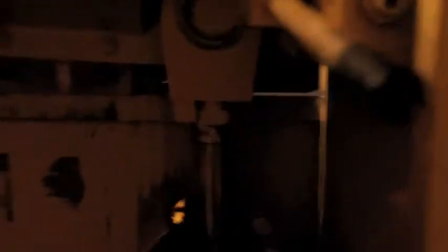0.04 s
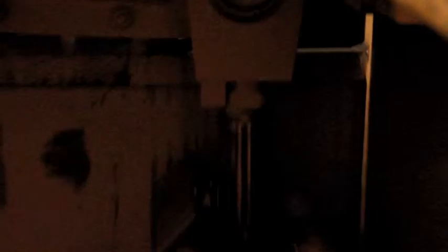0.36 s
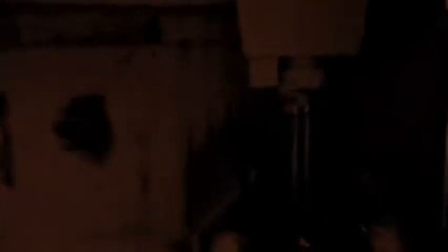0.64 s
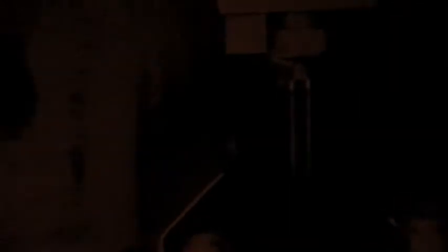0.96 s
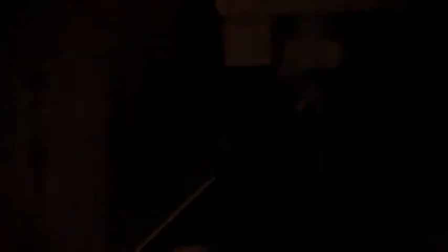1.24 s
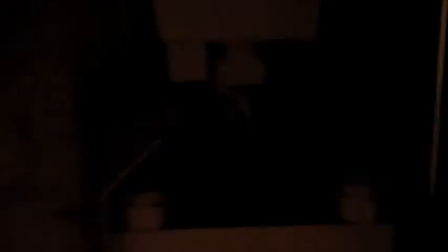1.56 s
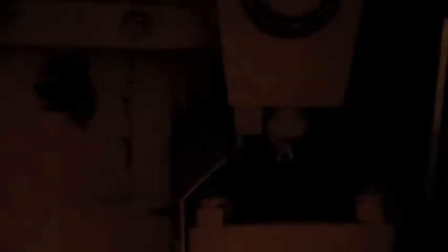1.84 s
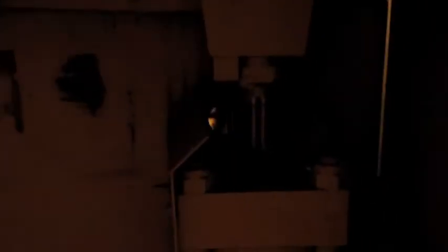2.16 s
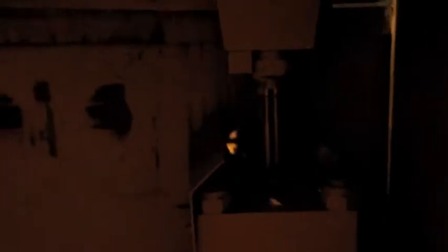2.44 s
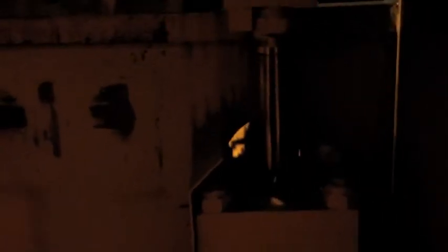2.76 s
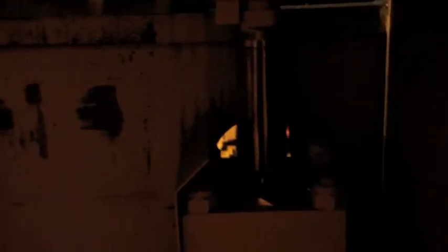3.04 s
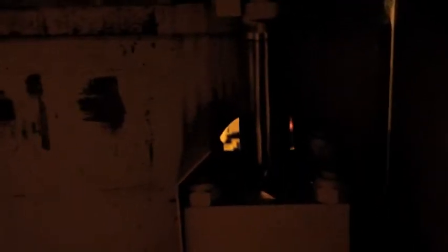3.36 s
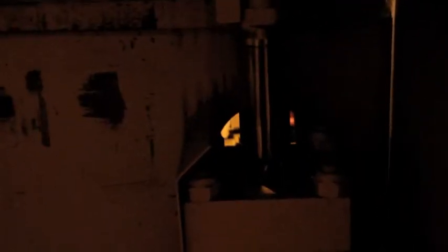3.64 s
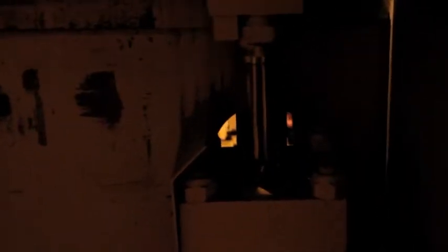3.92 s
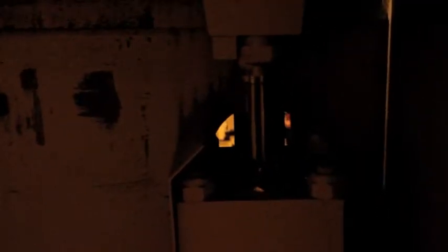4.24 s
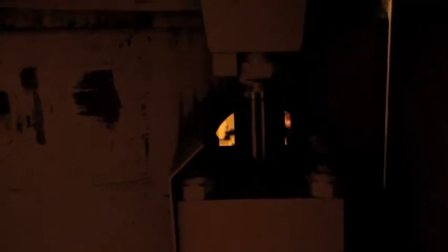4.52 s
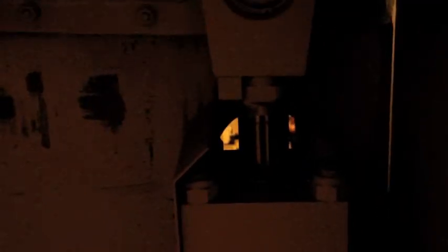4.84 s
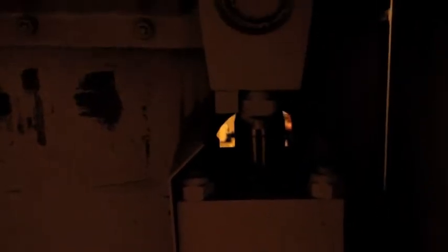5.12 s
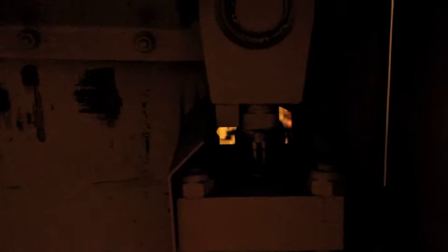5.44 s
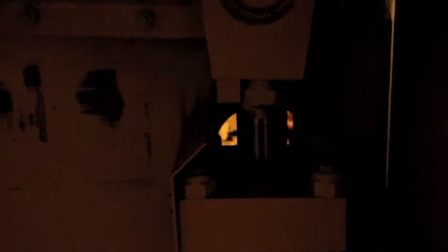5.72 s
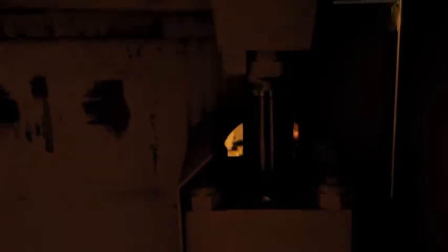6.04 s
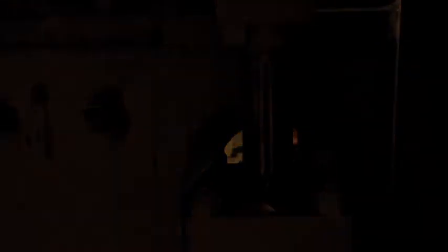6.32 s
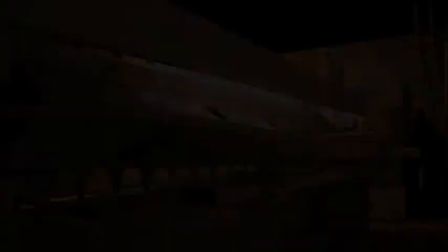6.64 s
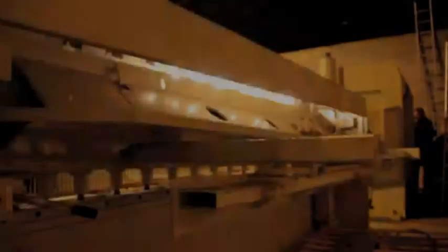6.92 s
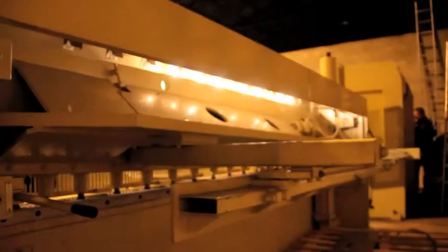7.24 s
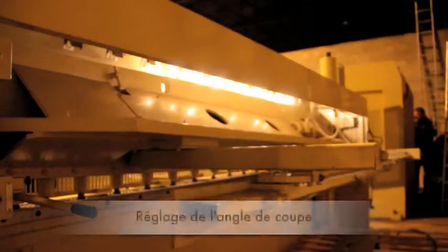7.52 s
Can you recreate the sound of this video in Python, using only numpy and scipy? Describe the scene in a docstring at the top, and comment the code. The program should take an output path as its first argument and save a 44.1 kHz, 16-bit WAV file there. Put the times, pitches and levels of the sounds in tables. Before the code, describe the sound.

Close machine hum with a raspy hydraulic whir, stopping and restarting with loud metallic clanks and low thuds indoors.

```python
"""The hydraulic pump of a plate shear hums in a workshop while the blade angle is adjusted.
Pressure ripple makes the hum; oil whirs through valves and pipes as the ram travels. At starts and stops
valves clack, the steel linkage clashes and pressure shocks thud in the frame. Panel rumble, fan wash and
oil hiss lie behind. Heard beside the cylinder, the sound fades out and returns from the machine's front."""
import sys
import numpy as np
from scipy import signal
from scipy.fft import rfft, irfft, next_fast_len
from scipy.io import wavfile
from scipy.ndimage import uniform_filter1d, minimum_filter1d, map_coordinates

SR = 44100
rng = np.random.default_rng(int(sys.argv[2]) if len(sys.argv) > 2 else 0)


def to_wav(sig):
    """Store sig (one row per channel, or 1-D mono) as 16-bit WAV at the path in sys.argv[1].

    Samples outside -1..1 are clipped; the rate is SR.
    """
    pcm = np.clip(np.atleast_2d(sig), -1, 1) * 32767
    pcm = np.round(pcm).astype(np.int16)
    wavfile.write(sys.argv[1], SR, pcm.T)  # frames by channels


N = 343098

MAIN_ORDER, STROKE_ORDER = 20, 10  # cycles per shaft turn
IDLE_S = (2.83, 3.33)  # pump free of pressure: start, stop
FRONT_S = 6.642  # heard from the front after this


# weak pump and motor lines: shaft order, level/dB re main tone
OVERTONES = [(24, -32), (26, -33), (28, -29), (30, -16.5), (32.1, -22), (36.2, -31), (38, -34), (40, -29),
             (51, -33), (60, -32), (70, -29)]
# idle tones: shaft order, relative level/dB
IDLE_TONES = [(5, -3), (25, -1)]

def pump(shaft, waver_db=1.34, throb_db=0.67, mains_db=-33, rest_db=-23.5, front_db=-8, idle_db=-32):
    """Pressure ripple: throbbing tones locked to the shaft, over the motor's mains hum."""
    def tone(order):
        return np.sqrt(2) * np.sin(order * shaft + rng.uniform(0, 2 * np.pi))

    def wavering(lines):
        return sum(amp(db + waver_db * wobble(7)) * tone(order) for order, db in lines)

    working = stroke_gain(DOWN, "hum") + stroke_gain(UP, "hum", release_s=0.066)
    hum_gain = np.hypot(amp(rest_db + front_db * in_front()), working)
    drone_gain = stroke_gain(DOWN, "drone", lag=2.9, db_per_s=-3)
    drone_gain += stroke_gain(UP, "drone", lag=1.38, release_s=0.077)
    idle_gain = amp(idle_db) * gate(*IDLE_S, attack_s=0.29, release_s=0.05)
    mains = amp(mains_db) * np.sqrt(2) * np.sin(2 * np.pi * 100 * clock())
    hum = amp(throb_db * wobble(16)) * tone(MAIN_ORDER) + wavering(OVERTONES) + mains
    drone = amp(throb_db * wobble(16)) * tone(STROKE_ORDER)
    return hum_gain * hum + drone_gain * drone + idle_gain * wavering(IDLE_TONES)


def shaft_angle(pump_hz=489.8, sag_hz=2.3, race_hz=9, front_hz=3):
    """Shaft angle in rad: the main tone sags under load, races at idle and is higher from the front."""
    load = loaded(attack_s=0.1993, release_s=0.299)
    idling = gate(*IDLE_S, attack_s=0.1503, release_s=0.35)
    main_hz = pump_hz - sag_hz * load + race_hz * idling + front_hz * in_front()
    return 2 * np.pi * np.cumsum(main_hz / MAIN_ORDER) / SR


# ram pressing, lifting: start/s, stop/s, base swell/s, base level/dB of hum, drone, wash, hiss, flow
DOWN = [(-.125, 1.8, 0.14, -13.5, -21.5, -44, -40.5, -30.5), (3.48, 5.432, 0.17, -14, -20, -41, -40, -29.5),
        (6.89, 7.8, 0.45, -12.5, -19.5, -37.5, -40.5, -31)]
UP = [(2.056, 2.82, 0.73, -14.5, -17, -41.5, -35.5, -42), (5.706, 6.47, 0.21, -20, -24, -47.5, -32, -48.5)]

def stroke_gain(strokes, layer, lag=1, db_per_s=0, release_s=0.051):
    """A layer swells over lag * swell as the ram sets off, drifts, and dies as the valve shuts."""
    column = ("hum", "drone", "wash", "hiss", "flow").index(layer)
    gain = np.zeros(N)
    for start, stop, swell_s, *levels_db in strokes:
        travel_s = np.clip(clock() - start, 0, stop - start)
        gain += amp(levels_db[column] + db_per_s * travel_s) * gate(start, stop, lag * swell_s, release_s)
    return gain


def loaded(attack_s, release_s):
    """Ramps to 1 while the ram presses down."""
    return sum(gate(start, stop, attack_s, release_s) for start, stop, *_ in DOWN)


def surge(t60_s, ramp_s=0.03):
    """Dying swell as each downstroke starts: the quicker the start, the stronger."""
    return sum(decay(np.abs(clock() - start), t60_s) * gate(start, stop, ramp_s, ramp_s) / swell_s
               for start, stop, swell_s, *_ in DOWN)


# oil-line resonances, at the cylinder and in front: f/Hz, width/Hz, relative level/dB
PIPES_NEAR = [(1586, 83, -3.5), (1870, 145, 0.5), (2210, 69, -6), (2520, 103, -2), (2664, 170, -3),
              (2866, 70, 2), (3460, 300, -9)]
PIPES_FRONT = [(1710, 400, -24), (2020, 120, -3.5), (2620, 240, -5), (2950, 77, 1), (3670, 410, -8.5),
               (4158.3, 350, -13.5)]
# oil-line whine, likewise: f/Hz, relative level/dB
WHINE_NEAR = [(1707, -34), (1835, -39), (1945, -39), (2175, -44), (2498, -46), (2643, -32.5), (2745, -40),
              (2885, -38)]
WHINE_FRONT = [(2024, -44), (2934, -48), (2982, -38), (3300, -59), (3510, -45)]

def oil_whir(shaft, pulsing=0.17, locked=1.05, whine_db=-6, waver_db=2.7, drift_rad=0.9):
    """Oil spurts at each pump stroke and rings the pipes; part of the rasp repeats every turn."""
    flow = stroke_gain(DOWN, "flow", lag=1.7, db_per_s=2.5, release_s=0.24)
    flow += stroke_gain(UP, "flow", lag=1.2, release_s=0.06)
    one_turn = rng.standard_normal(1800)
    repeating = unit(np.interp(shaft / (2 * np.pi) % 1, np.linspace(0, 1, len(one_turn)), one_turn))
    jet = (rng.standard_normal(N) + locked * repeating) * (1 + pulsing * np.sin(STROKE_ORDER * shaft))

    def pipes(modes, tones):
        def response(f):
            peaks = (amp(db) / (1 + ((f - hz) / width) ** 2) for hz, width, db in modes)
            return np.sqrt(sum(peak ** 2 for peak in peaks))

        whine = np.zeros(N)
        for hz, db in tones:
            gain = amp(db + waver_db * wobble(9))
            whine += gain * np.sin(2 * np.pi * hz * clock() + drift_rad * wobble(14))
        return unit(filtered(jet, response)) + amp(whine_db) * unit(whine)

    flow *= amp(0.8 * wobble(14))
    return flow * np.where(in_front(), pipes(PIPES_FRONT, WHINE_FRONT), pipes(PIPES_NEAR, WHINE_NEAR))


# valve and relay contacts: t/s, level/dB, t60/s, tilt/(dB/oct)
CLACKS = [(.035, -16, 0.14, -11.5), (0.0845, -10.5, 0.051, 0.5), (1.8022, -14.5, 0.12, 2),
          (1.849, -13.5, 0.12, -3.5), (2.803, -24, .049, 18), (2.816, -13.5, 0.12, 0.5),
          (2.857, -19.5, 0.1, 5.5), (2.89, -20, 0.17, -7), (3.0076, -36.5, 0.055, 5),
          (3.177, -25.5, .036, -5.5), (3.2271, -36, .04, 9), (3.2912, -11.5, 0.19, 1.5),
          (3.315, -11.5, 0.12, -3.5), (3.338, -18, .072, 12), (3.497, -10, 0.062, 16),
          (3.709, -13.5, 0.072, -.5), (5.4324, -13, .14, -1), (5.453, -14.5, .14, 0),
          (5.4857, -10, .11, -5), (5.5154, -11, 0.11, -2), (5.55, -22.5, 0.52, -4),
          (5.765, -18.5, .15, 2.5), (6.455, -30, .05, 12), (6.471, -17, 0.087, 2.5),
          (6.527, -23.5, 0.23, -8.5), (6.7497, -19.5, 0.29, 4)]
# contact noise: f/Hz, relative level/dB
CLACK_SPECTRUM = [(150, -36.5), (700, -15), (1400, -6.5), (2200, -2.5), (4000, -4.5), (5200, -3.5),
                  (6500, -10), (9000, -14.5), (11500, -14.5), (13000, -20), (15700, -35)]
# valve modes: f/Hz, relative level/dB, t60/s before contact damping
VALVE_MODES = [(1459, -4, 0.084), (2850, -1.5, .1), (5130, -14, .15), (4970, -1, 0.07), (5860, 1, 0.076)]

def valve_clacks(attack_s=0.0015, ring_db=-4):
    """Spools and relays hit their stops: a quickly damped steel ring."""
    out, t = np.zeros(N), np.arange(SR // 3) / SR
    for start, db, t60_s, tilt_db in CLACKS:
        modes = [(hz, level + tilt_db * np.log2(hz), ring_s) for hz, level, ring_s in VALVE_MODES]
        body = noise(CLACK_SPECTRUM, len(t), tilt_db) + amp(ring_db) * ring(modes, t)
        add(out, start, amp(db) * decay(t, t60_s) * (1 - np.exp(-t / attack_s)) * body)
    return out


# linkage taking up slack: t/s, level/dB, swell/s, scrape t60/s, tilt/(dB/oct)
CLASHES = [(2.056, -0.5, 0.0077, 0.072, 4.5), (3.498, -13.5, 0.011, 0.16, -2),
           (5.706, -2, 0.011, 0.083, 2.5)]
# sliding steel: f/Hz, relative level/dB
SCRAPE_SPECTRUM = [(350, -32.5), (600, 2), (980, -1), (1170, -2), (2160, -3), (3030, -7.5), (3290, -1),
                   (4210, -1), (4630, -7.5), (6160, -6.5), (7250, -12.5), (9920, -8.5), (14100, -26.5),
                   (15600, -41)]
# linkage modes: f/Hz, relative level/dB, t60/s
LINKAGE_MODES = [(3500, -8, .18), (3950, -13, .2), (4240, -9.5, .22), (5100, -5, .22), (6140, 0, .18),
                 (6800, 0, 0.19), (8250, 1, .16), (9600, 3, .17), (10200, -5, 0.15)]

def linkage_clashes(ring_db=-11, chatter_db=2):
    """Steel slides with growing chatter, slams home and rings, blurred by the rattling joint."""
    out, t = np.zeros(N), np.arange(-SR // 10, SR // 2) / SR
    after_s = np.maximum(t, 0)
    for impact_s, db, swell_s, t60_s, tilt_db in CLASHES:
        chatter = amp(chatter_db * unit(uniform_filter1d(rng.standard_normal(len(t)), size=60)))
        scrape = unit(chatter * noise(SCRAPE_SPECTRUM, len(t), tilt_db)) * decay(after_s, t60_s)
        rattle = unit(uniform_filter1d(rng.standard_normal(len(t)), size=110))
        ringing = amp(ring_db) * rattle * ring(LINKAGE_MODES, after_s)
        swell = np.exp(np.minimum(t, 0) / swell_s)
        add(out, impact_s + t[0], amp(db) * swell * (scrape + ringing))
    return out


# pressure shocks: t/s, level/dB, loss per return/dB
SHOCKS = [(1.833, -3.5, 6), (2.828, -15, 8), (2.887, -7, 7.5), (3.331, -6, 13), (3.498, -18, 4),
          (5.473, -4.5, 3), (6.54, -10.5, 12), (6.736, -10, 30)]
# panel shudder: f/Hz, relative level/dB
SHUDDER_SPECTRUM = [(30, -50), (65, -24), (95, -5.5), (135, -4), (225, 1), (330, -9), (410, -1),
                    (600, -8.5), (2000, -25.5), (5000, -74)]
# frame modes: f/Hz, relative level/dB, t60/s before the thud envelope
FRAME_MODES = [(133.5, 3.5, 0.37), (180, -3, 0.3), (223.3, 1.5, 0.26), (278, -2.5, 0.29),
               (389.6, -4.5, 0.35)]

def frame_thuds(attack_s=0.0027, t60_s=0.29, return_s=0.056, shudder_db=-7, passes=4):
    """A shock runs to and fro in the oil lines, striking frame and panels more weakly at each return."""
    out, t = np.zeros(N), np.arange(SR // 2) / SR
    envelope = decay(t, t60_s) * (1 - np.exp(-t / attack_s))
    for start, db, loss_db in SHOCKS:
        for k in range(passes):
            body = amp(shudder_db) * noise(SHUDDER_SPECTRUM, len(t)) + ring(FRAME_MODES, t)
            add(out, start + k * return_s, amp(db - k * loss_db) * envelope * body)
    return out


# panel rumble, at the cylinder and in front: f/Hz, relative level/dB
RUMBLE_NEAR = [(25, -27), (65, -13.5), (100, -4), (135, -5), (220, 0.5), (300, -6.5), (500, -6.5),
               (1000, -42)]
RUMBLE_FRONT = [(25, -18), (70, -5), (135, 4.5), (195, -11), (320, -2.5), (500, -9.5), (1000, -45)]

def panel_rumble(rest_db=-32, idle_db=4, ducked_db=-11, front_db=-31, swell_db=-39):
    """Low rumble, louder at idle, swells as a downstroke starts, then sinks as the recorder's
    automatic gain turns down (a timed ramp). Steady from the front."""
    gain_shift_db = idle_db * gate(*IDLE_S, attack_s=0.075, release_s=0.42)
    gain_shift_db += ducked_db * loaded(attack_s=1.28, release_s=0.06)
    near = np.hypot(amp(rest_db + gain_shift_db), amp(swell_db) * surge(t60_s=1.4)) * noise(RUMBLE_NEAR)
    return np.where(in_front(), amp(front_db) * noise(RUMBLE_FRONT), near)


# fan noise: f/Hz, relative level/dB
FAN_SPECTRUM = [(100, -18), (250, -1), (450, 0.5), (680, 2.5), (850, -4), (1250, -5), (1700, -7),
                (2200, -8.5), (3200, -12), (4500, -17.5), (7000, -24.5), (15700, -75)]

def fan_wash(rest_db=-37, front_db=9, press_db=8, lift_db=6):
    """Motor fan: a broad wash, louder during strokes and in front, duller as the ram lifts."""
    pressing = amp(press_db) * stroke_gain(DOWN, "wash", lag=0.22, release_s=0.1)
    lifting = amp(lift_db) * stroke_gain(UP, "wash", lag=0.88, release_s=0.094)
    gain = np.hypot(amp(rest_db + front_db * in_front()), pressing)
    flutter = amp(0.45 * wobble(24))
    return flutter * (gain * noise(FAN_SPECTRUM) + lifting * noise(FAN_SPECTRUM, tilt_db=-2))


# oil-circuit hiss: f/Hz, relative level/dB
HISS_SPECTRUM = [(1500, -20), (3500, 2), (5000, 3), (6500, -2.5), (9000, -4.5), (10800, -3.5),
                 (12300, -7.5), (14000, -13.5), (15700, -20)]

def oil_hiss(rest_db=-55, idle_db=-47, front_db=-49, spurt_db=-49):
    """Oil hisses faintly at rest, spurts and grows on a downstroke, bleeds off duller on an upstroke."""
    idling = gate(IDLE_S[0] - 0.3, IDLE_S[1], attack_s=0.18, release_s=0.2)
    steady = amp(rest_db) + amp(idle_db) * idling + amp(front_db) * in_front()
    flowing = stroke_gain(DOWN, "hiss", lag=1.6, db_per_s=2, release_s=0.1)
    bleeding = stroke_gain(UP, "hiss", lag=0.05, db_per_s=-26.5)
    gain = np.hypot(steady + amp(spurt_db) * surge(t60_s=1.36), flowing)
    return gain * noise(HISS_SPECTRUM) + bleeding * noise(HISS_SPECTRUM, tilt_db=-4)


# workshop reverberation: f/Hz, t60/s
WORKSHOP_T60 = [(150, 0.74), (1500, 0.44), (5000, 0.22), (14000, 0.11)]

def workshop_echo(x):
    """Diffuse tail, dying sooner in the treble."""
    hz, t, spectra = signal.stft(rng.standard_normal(SR), SR, nperseg=256)
    _, tail = signal.istft(spectra * decay(t, along(WORKSHOP_T60, hz)[:, None]), SR, nperseg=256)
    return signal.fftconvolve(x, tail / np.linalg.norm(tail))[:N]


def steel_walls(x, wet=0.54, t60_s=0.13, corner_hz=3000):
    """Reflections between close steel walls comb the treble into fine peaks."""
    t = np.arange(SR // 8) / SR
    echoes = rng.standard_normal(len(t)) * decay(t, t60_s)
    treble = filtered(echoes / np.linalg.norm(echoes), lambda hz: hz ** 4 / (hz ** 4 + corner_hz ** 4))
    return x + wet * signal.fftconvolve(x, treble)[:N]


def limiter(x, ceiling_db=-0.3, release_s=0.094, window=700):
    """Ducks just ahead of peaks and recovers smoothly: the hum dips after loud blows."""
    over_db = np.maximum(20 * np.log10(np.abs(x) + 1e-9) - ceiling_db, 1e-6)
    held_db = -minimum_filter1d(-over_db, window)
    age = clock() / release_s
    duck_db = np.exp(np.maximum.accumulate(np.log(held_db) + age) - age)  # exponential release
    return x * amp(-uniform_filter1d(duck_db, window))


def amp(db):
    """Decibels to gain."""
    return 10 ** (np.asarray(db) / 20)


def decay(t, t60_s):
    """Gain falling 60 dB in t60_s."""
    return amp(-60 * t / t60_s)


def unit(x):
    """Scale to rms 1."""
    return x / np.sqrt(np.mean(x ** 2) + 1e-20)


def clock():
    """Sample times in s."""
    return np.arange(N) / SR


def in_front():
    """True while heard from the front."""
    return clock() > FRONT_S


def gate(start, stop, attack_s, release_s):
    """Ramps to 1 after start, back to 0 after stop."""
    t = clock()
    return np.clip((t - start) / attack_s, 0, 1) * np.clip(1 - (t - stop) / release_s, 0, 1)


def along(points, hz):
    """Interpolate (f/Hz, value) points on a log axis."""
    f, values = np.transpose(points)
    return np.interp(np.log(hz + 1), np.log(f + 1), values)


def wobble(knots_per_s):
    """Smooth random curve."""
    knots = rng.standard_normal(int(N * knots_per_s / SR) + 4)
    return map_coordinates(knots, [clock() * knots_per_s])


def filtered(x, response):
    """Apply a gain given as a function of f/Hz."""
    size = next_fast_len(len(x) + 4096)
    return irfft(rfft(x, size) * response(np.fft.rfftfreq(size, 1 / SR)), size)[:len(x)]


def noise(spectrum, size=N, tilt_db=0):
    """Shaped noise of rms 1, tilted by tilt_db per octave above 1 kHz."""
    def response(hz):
        return amp(along(spectrum, hz) + tilt_db * np.log2(np.maximum(hz, 1000) / 1000))

    return unit(filtered(rng.standard_normal(size), response))


def ring(modes, t):
    """Struck modes, their strengths varied per blow, starting near rms 1."""
    hz, db, t60_s = np.transpose(modes)[:, :, None]
    gain = amp(db + rng.normal(0, 2, db.shape))
    partials = gain * decay(t, t60_s) * np.sin(2 * np.pi * hz * t)
    return np.sum(partials, 0) / np.sqrt(np.sum(gain ** 2) / 2)


def add(track, start_s, sound):
    """Mix a sound in at start_s."""
    start = max(round(start_s * SR), 0)
    track[start:start + len(sound)] += sound[:N - start]


def scene(echo_db=-7.5):
    """Pump, oil and the blows of the mechanism, over the workshop background."""
    shaft = shaft_angle()
    blows = valve_clacks() + linkage_clashes() + frame_thuds()
    hydraulics = pump(shaft) + oil_whir(shaft)
    background = panel_rumble() + fan_wash() + oil_hiss() + amp(echo_db) * workshop_echo(blows)
    return (hydraulics + blows + steel_walls(background))[None]


def record(dry, low_cut_hz=48, top_hz=15750, fade_out_s=0.38, fade_in_s=0.32):
    """Limit and round the peaks, fade between the two positions, limit the band."""
    limited, t = limiter(dry[0]), clock()
    rounded = limited / (1 + np.abs(limited / 0.95) ** 8) ** (1 / 8)
    ramps = np.maximum((FRONT_S - t) / fade_out_s, (t - FRONT_S) / fade_in_s)
    faded = rounded * np.minimum(ramps, 1) ** 1.105
    return filtered(faded, lambda hz: (hz / np.hypot(hz, low_cut_hz)) ** 2 * (hz < top_hz))[None]


dry = scene()
out = record(dry)
to_wav(out)
```